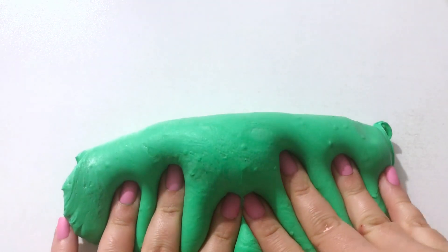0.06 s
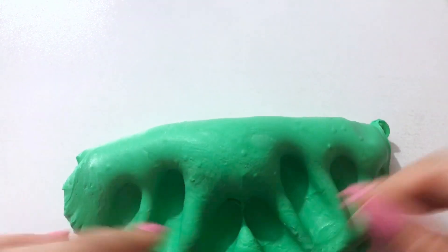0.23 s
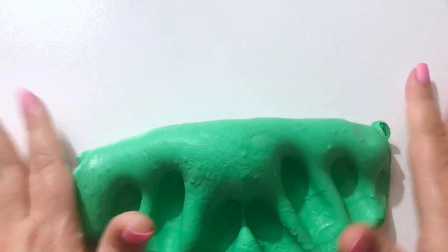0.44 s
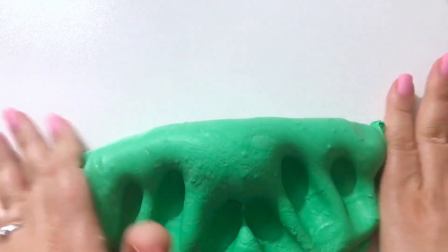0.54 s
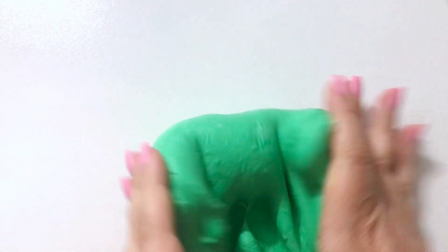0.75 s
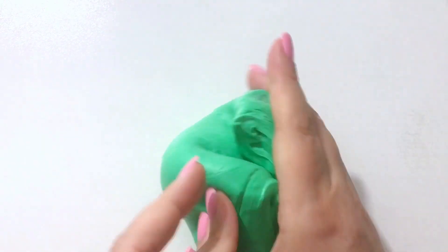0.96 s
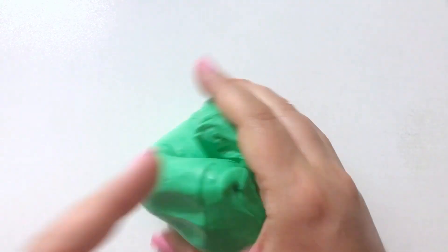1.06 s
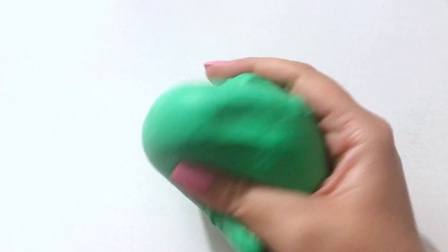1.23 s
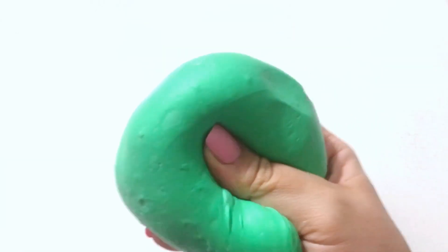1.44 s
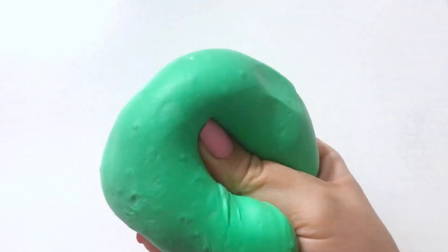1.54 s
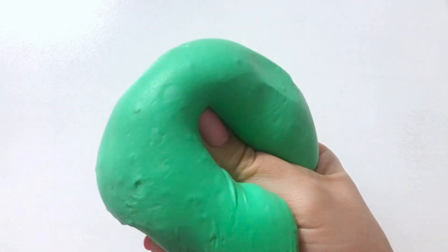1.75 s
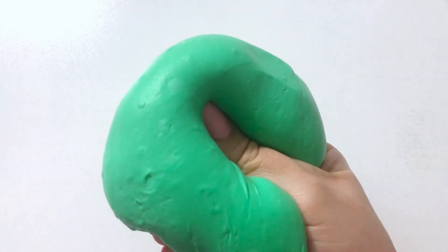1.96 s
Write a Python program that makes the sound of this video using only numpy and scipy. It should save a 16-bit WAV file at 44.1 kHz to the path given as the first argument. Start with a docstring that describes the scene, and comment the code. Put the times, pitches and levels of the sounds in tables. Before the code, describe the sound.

Soft slime squished by hand, with one smack and small sticky pops and crackles.

```python
"""Soft slime squashed and folded by hand on a table, close to the microphone in a quiet room.
A hand swipes over the table, then the palms meet the slime with one loud smack and push it together.
Sticky contacts let go in a fine fizz, air pockets pop and wet gaps open with a falling squelch.
Underneath, each shove sets the table wobbling at a very low pitch."""
import sys
import numpy as np
from scipy import signal
from scipy.fft import rfft, irfft
from scipy.io import wavfile
from scipy.ndimage import uniform_filter1d

SR = 44100
rng = np.random.default_rng(int(sys.argv[2]) if len(sys.argv) > 2 else 0)


def generate_wav(signal):
    """Clip the signal to [-1, 1] and save it as 16-bit WAV at the path in sys.argv[1]."""
    frames = np.transpose(np.atleast_2d(signal))
    scaled = np.clip(frames, -1, 1) * 32767
    pcm = np.round(scaled).astype(np.int16)
    wavfile.write(sys.argv[1], SR, pcm)


N = 88200
T = np.arange(N) / SR
CLICK_SAMPLES = 2048
CLICK_HZ = np.fft.rfftfreq(CLICK_SAMPLES, 1 / SR) + 1  # frequencies of a click's spectrum


def slime_bursts():
    """Air pockets, small bubbles and wet gaps give way under the hands, right at the microphone."""
    # air pockets: start_s, snap_db, snap_top_hz, ring_hz, ring_db, hollow_hz, hollow_db
    pockets = [(0.1733, -48, 9000, 2440, -25, 1220, -25.5), (0.6286, -55, 9400, 6550, -27, 2780, -27),
               (.646, -36.5, 11800, 7140, -35, 750, -19.5), (0.6897, -50, 12000, 2440, -22.5, 1090, -32),
               (0.748, -33, 15000, 2070, -21, 1420, -23.5), (0.7535, -37, 12000, 2180, -23.5, 1420, -16.5),
               (1.082, -41.5, 14500, 7000, -16.5, 600, -30), (1.1573, -41, 10800, 4040, -46, 750, -29.5),
               (1.1937, -39.5, 12000, 6550, -28.5, 450, -23),
               (1.2429, -31.5, 11000, 6240, -24.5, 2760, -25), (1.399, -37.5, 5570, 6800, -29, 1030, -33.5),
               (1.4498, -49, 15000, 2170, -34.5, 1150, -27.5),
               (1.7526, -35.5, 10400, 4380, -27, 1810, -30.5), (1.7582, -34.5, 8900, 4030, -33, 1200, -34)]
    # small bubbles: start_s, level_db, ring_hz, sharpness_q
    bubbles = [(.4675, -38.5, 1400, 1.3), (.7608, -21, 1200, 2.4), (.881, -38.5, 5040, 0.22),
               (.9267, -39.5, 3500, .3), (1.1117, -33, 10000, 0.48), (1.3263, -30.5, 6650, 4),
               (1.341, -50, 11000, 1.5), (1.3503, -32, 8900, 4.8), (1.4892, -38.5, 7450, 4.2),
               (1.522, -30, 7240, 3.4), (1.6025, -42.5, 4100, 5.5), (1.7087, -44.5, 6300, 4.5),
               (1.7809, -42.5, 10100, 1.6), (1.8857, -27, 5470, 3.7), (1.9564, -39, 2300, 2.4),
               (1.9695, -43.5, 7640, 1.5)]
    # wet gaps: start_s, level_db, start_hz, end_hz, decay_s
    gaps = [(.2128, -51, 820, 604, 0.0029), (.2305, -51, 1050, 558, 0.0039),
            (.2428, -48.5, 1506, 527, 0.0033), (1.2425, -57, 830, 290, 0.0015),
            (1.3988, -56.5, 990, 380, 0.00089)]
    out = np.zeros(N)
    for rows, sound in (pockets, pocket_pop), (bubbles, bubble_tick), (gaps, squelch):
        for start_s, *settings in rows:
            add(out, start_s, sound(*settings))
    return out


def pocket_pop(snap_db, snap_top_hz, ring_hz, ring_db, hollow_hz, hollow_db):
    """A film snaps; the opened pocket rings very briefly at two resonances."""
    snap_low_hz, ring_q, hollow_q = 920, 4.6, 3.54
    snap = amp(snap_db) * (CLICK_HZ / np.hypot(CLICK_HZ, snap_low_hz)) ** 2
    ring = amp(ring_db) / np.hypot(1, ring_q * detuning(ring_hz))
    hollow = amp(hollow_db) / (1 + (hollow_q / 2 * detuning(hollow_hz)) ** 2)
    spectrum = np.sqrt(snap ** 2 + ring ** 2 + hollow ** 2)
    return torn_click(spectrum / np.hypot(1, (CLICK_HZ / snap_top_hz) ** 3))


def bubble_tick(level_db, ring_hz, q=0.75):
    """A small bubble bursts with a single damped resonance."""
    ring = amp(level_db) / np.hypot(1, q * detuning(ring_hz))
    return torn_click(ring / np.hypot(1, (CLICK_HZ / (2 * ring_hz)) ** 4))


def palm_smack(level_db=-13):
    """One loud smack as the palms meet the slime."""
    # smack spectrum: frequency_hz, gain_db
    colour = [(550, -12.5), (1050, 0), (1600, -4.5), (2300, -15), (4600, -2), (5600, -24), (6300, -14),
              (7100, -6), (16000, -11)]
    return torn_click(amp(level_db) * gain_at(CLICK_HZ, colour))


def squelch(level_db, start_hz, end_hz, decay_s):
    """A wet gap opens between skin and slime: its damped, ragged resonance falls as it widens."""
    t = T[:CLICK_SAMPLES]
    pitch_hz = end_hz + (start_hz - end_hz) * np.exp(-t / decay_s)
    envelope = 2 * t / decay_s * np.exp(1 - 2 * t / decay_s)
    ragged = 1 + 0.45 * unit(uniform_filter1d(rng.standard_normal(len(t)), size=24))
    return amp(level_db) * envelope * ragged * np.sin(2 * np.pi * np.cumsum(pitch_hz) / SR)


def squeeze_prickle(start_s=1.4, length_s=0.85, count=45, loudest_db=-49.5, lowest_hz=3520):
    """Tiny bubbles burst at random in the last squeeze, ever more rarely."""
    out = np.zeros(N)
    for when, pitch, faintness in rng.random((count, 3)):
        tick = bubble_tick(loudest_db - 10 * np.sqrt(faintness), lowest_hz * 2 ** (2 * pitch))
        add(out, start_s + length_s * when ** 2, tick)
    return out


def kneading():
    """Slime slides and peels under the palms: bright fizz, wet middle and dull pressing."""
    # kneading levels: time_s, fizz_db, wet_db, press_db
    levels = [(0.459, -85, -90, -91), (.52, -78, -71.5, -84), (.59, -75, -77, -84.5),
              (.64, -65.5, -68, -86), (.72, -66, -72, -87), (0.759, -63, -68, -69), (.84, -62, -69, -81),
              (.90, -77.5, -79, -82), (.935, -68.5, -76, -82), (1.031, -78, -82, -85),
              (1.075, -66, -67, -68), (1.14, -82, -82.5, -82), (1.205, -69, -73, -78.5),
              (1.24, -62.5, -76, -68), (1.275, -78.5, -80, -84), (1.40, -87, -88, -88.5)]
    # spectra of the three layers: frequency_hz, gain_db
    fizz = [(1500, -10.5), (3300, -8), (4400, 0), (5200, -4), (6900, 3), (8500, 1), (11000, -2),
            (15500, -2.5)]
    wet = [(400, -22.5), (900, -3.5), (1400, 3), (1900, -8), (2500, -4), (3400, -17), (7000, -20)]
    press = [(80, -3.5), (400, 0.5), (700, -3.5), (1200, -27), (3000, -25)]
    return friction(levels, (fizz, wet, press), grains_per_s=(5300, 1300, 1300))


def hand_swipe():
    """Skin slides over the table, then grips: tiny contacts hiss and larger slips drag."""
    # swipe levels: time_s, hiss_db, drag_db
    levels = [(.13, -88.5, -100), (.175, -59.5, -84), (.218, -57, -55.5), (.248, -63, -57),
              (.278, -66, -66), (.295, -102, -94)]
    # spectra of the two layers: frequency_hz, gain_db
    hiss = [(300, -11), (700, 0), (1400, 3), (1900, -7), (2500, -2), (3500, -8), (5000, -3), (7000, 0.5),
            (11500, -7), (15500, -6.5)]
    drag = [(60, 3), (150, 7.5), (300, 0), (700, -3), (1200, -18), (2000, -24.5), (9000, -59)]
    return friction(levels, (hiss, drag), grains_per_s=(5300, 1300))


def table_wobble(skew=0.72, cutoff_hz=95):
    """Each shove rocks the table in a low tone that swells and fades."""
    # shoves: start_s, length_s, level_db, pitch_hz
    shoves = [(-.03, 0.23, -52.5, 34.14), (0.158, 0.18, -43, 36.4), (0.249, 0.035, -36.5, 53),
              (0.293, 0.082, -41.5, 32.75), (0.364, 0.12, -49, 35.7), (0.478, 0.1, -35, 36.7),
              (0.581, 0.2, -34.5, 34.94), (0.778, 0.34, -37, 37.15), (1.036, 0.21, -31.5, 34.95),
              (1.243, .22, -44, 34.25), (1.46, 0.18, -55, 34.1)]
    out = np.zeros(N)
    for start_s, length_s, level_db, pitch_hz in shoves:
        t = np.arange(0, length_s, 1 / SR)
        arch = abs(np.sin(np.pi * (t / length_s) ** skew)) ** 0.99
        add(out, start_s, np.sqrt(2) * amp(level_db) * arch * np.sin(2 * np.pi * pitch_hz * t))
    return signal.sosfiltfilt(signal.butter(2, cutoff_hz, fs=SR, output="sos"), out)


def room_reverb(close, t60_s=0.3, level_db=-14.5):
    """The room's short tail, well below the direct sound at this distance."""
    tail = echoes(t60_s / np.log(1000), build_s=0.0059, samples=16000)
    return amp(level_db) * signal.fftconvolve(close, tail)[:N]


def room_tone(level_db=-65):
    """The quiet room: a steady low rumble with faint hiss."""
    # background spectrum: frequency_hz, gain_db
    colour = [(35, 21), (70, 4.5), (300, -8), (600, -13), (1250, -12), (1900, -21.5), (6800, -26.5),
              (16000, -27.5)]
    return amp(level_db) * coloured(rng.standard_normal(N), colour)


def torn_click(spectrum, smear=0.5):
    """A click spreads over a few swings as the film tears, then bounces off nearby surfaces."""
    allpass = [smear ** 2, -2 * smear, 1]
    torn = signal.lfilter(allpass, allpass[::-1], shortest_click(spectrum))
    hands_and_table = amp(-4) * echoes(decay_s=0.001)
    things_nearby = amp(-8) * echoes(decay_s=0.0028)
    path = hands_and_table + things_nearby
    path[0] += 1  # direct sound
    return signal.fftconvolve(torn, path / np.linalg.norm(path))


def friction(levels, colours, grains_per_s, fade_db_per_s=29):
    """Layers of crackle, each following its own level curve and fading beyond its ends."""
    time_s, *curves_db = np.transpose(levels)
    fade_db = fade_db_per_s * abs(T - np.clip(T, time_s[0], time_s[-1]))
    out = np.zeros(N)
    for curve_db, colour, rate in zip(curves_db, colours, grains_per_s):
        envelope = amp(np.interp(T, time_s, curve_db) - fade_db)
        out += envelope * coloured(crackle(rate), colour)
    return out


def crackle(grains_per_s, spread_db=3.5, smooth_share=0.36):
    """Many tiny sticky contacts let go over smooth friction."""
    sizes = amp(spread_db * np.minimum(rng.exponential(1, N), 4))
    grains = sizes * rng.choice([-1, 1], N) * (rng.random(N) < grains_per_s / SR)
    return np.sqrt(1 - smooth_share) * unit(grains) + np.sqrt(smooth_share) * rng.standard_normal(N)


def echoes(decay_s, build_s=0.00082, samples=CLICK_SAMPLES):
    """A cloud of reflections builds and dies away, at unit energy."""
    t = T[:samples]
    cloud = rng.standard_normal(samples) * np.exp(-t / decay_s) * np.clip(t / build_s, 0, 1) ** 2
    return cloud / np.linalg.norm(cloud)


def shortest_click(spectrum):
    """The minimum-phase click that has this spectrum."""
    log_gain = np.log(np.maximum(np.r_[spectrum, spectrum[-2:0:-1]], 1e-6))
    return np.fft.ifft(np.exp(np.conj(signal.hilbert(log_gain)))).real


def detuning(centre_hz):
    """How far each frequency of a click lies from a resonance."""
    return CLICK_HZ / centre_hz - centre_hz / CLICK_HZ


def gain_at(hz, colour):
    """Reads a spectrum's gain along a log frequency axis."""
    frequency_hz, gain_db = np.transpose(colour)
    return amp(np.interp(np.log(hz), np.log(frequency_hz), gain_db))


def coloured(x, colour):
    """Gives x a spectrum, at unit rms."""
    hz = np.fft.rfftfreq(N, 1 / SR) + 1
    return unit(irfft(rfft(x) * gain_at(hz, colour), N))


def amp(db):
    """Decibels to gain."""
    return 10 ** (np.asarray(db) / 20)


def unit(x):
    """Scales to an rms of one."""
    return x / np.sqrt(np.mean(x ** 2) + 1e-20)


def add(mix, start_s, sound):
    """Mixes a sound in, trimmed to the ends of the mix."""
    at = round(start_s * SR)
    sound = sound[max(-at, 0):]
    part = mix[max(at, 0):][:len(sound)]
    part += sound[:len(part)]


def scene():
    """Slime and hands up close in mono, with a little room, the table and the room tone behind."""
    close = slime_bursts()
    add(close, start_s=0.5077, sound=palm_smack())
    close += squeeze_prickle() + hand_swipe() + kneading()
    return (close + room_reverb(close) + table_wobble() + room_tone())[None]


def record(dry):
    """The recorder cuts the treble above its band limit."""
    limit_hz = 16100
    lowpass = signal.firwin(255, limit_hz, window=("kaiser", 9), fs=SR)
    return signal.oaconvolve(dry, lowpass[None], "same")


dry = scene()
out = record(dry)
generate_wav(out)
```